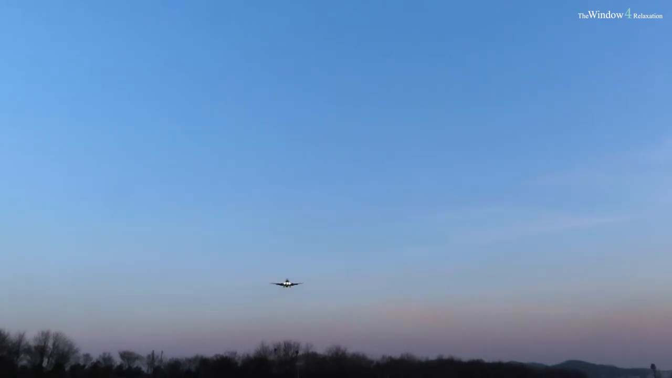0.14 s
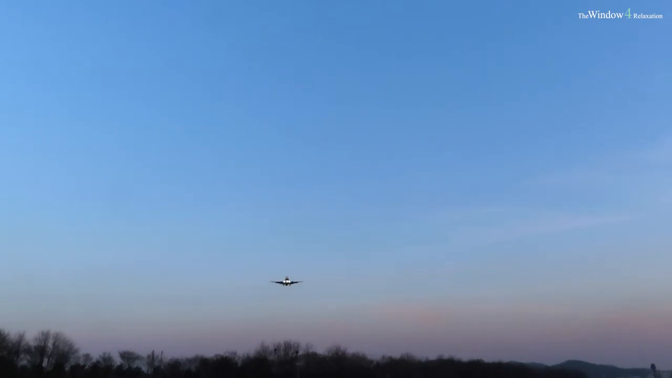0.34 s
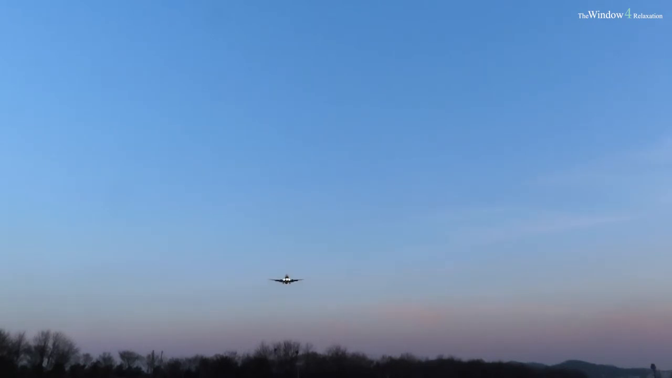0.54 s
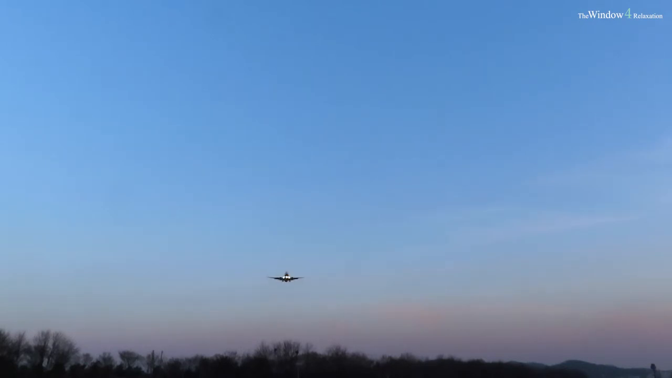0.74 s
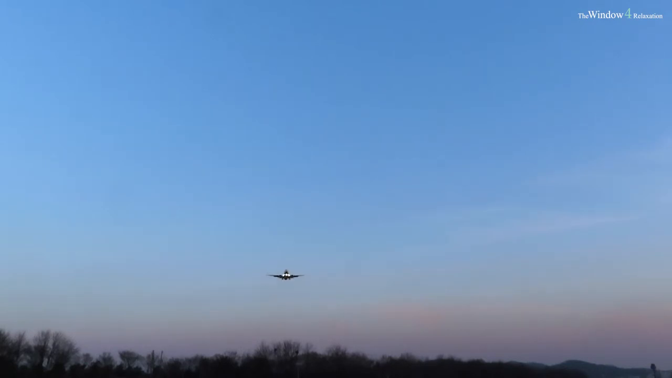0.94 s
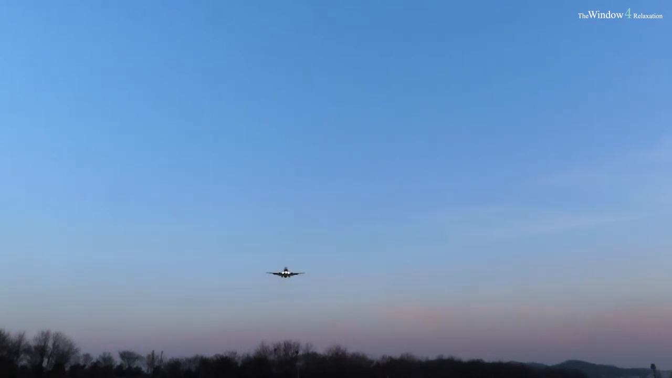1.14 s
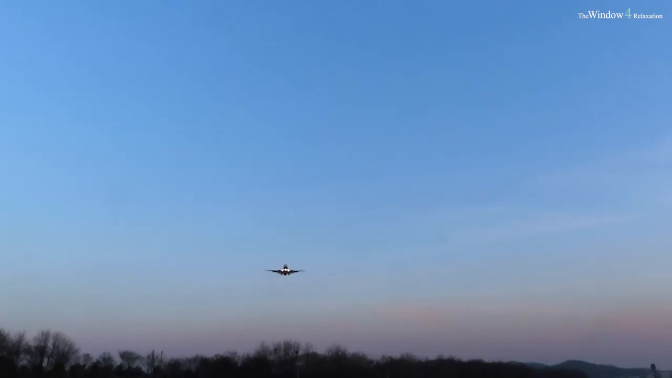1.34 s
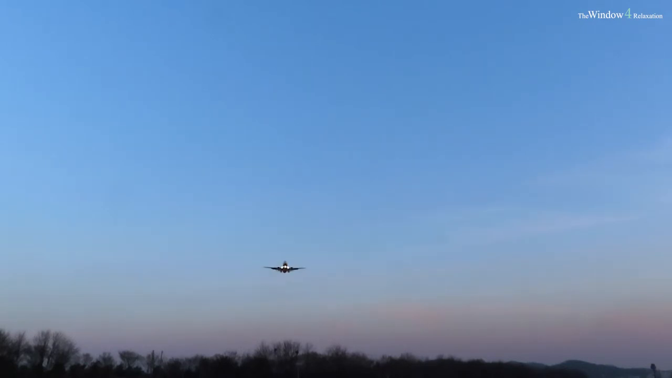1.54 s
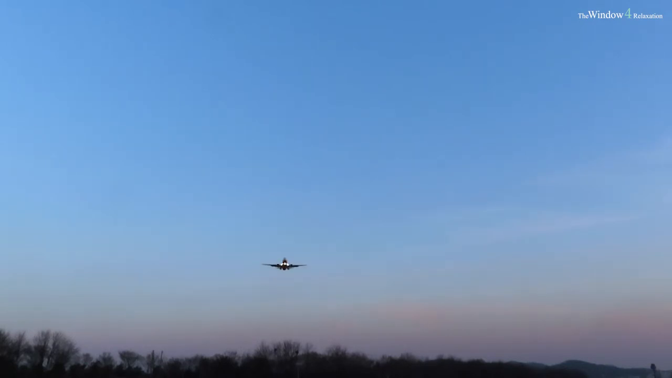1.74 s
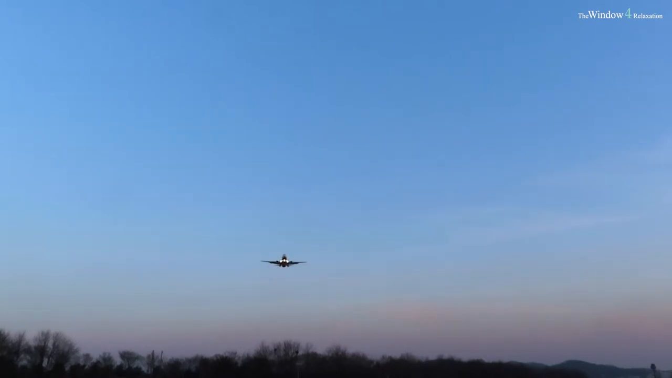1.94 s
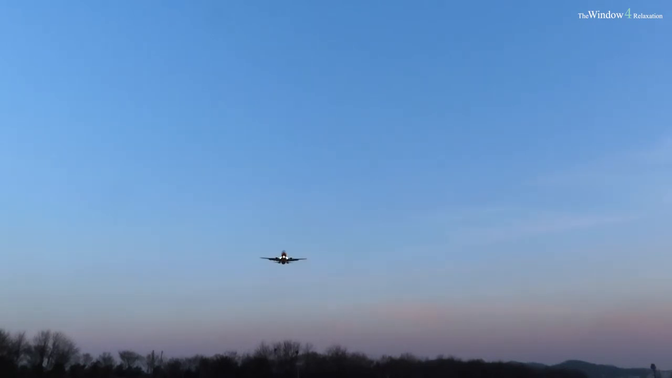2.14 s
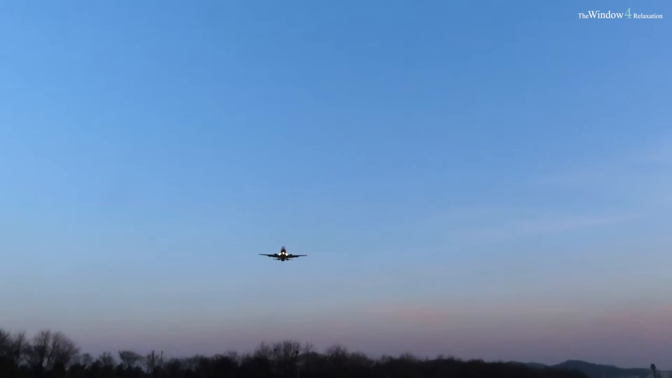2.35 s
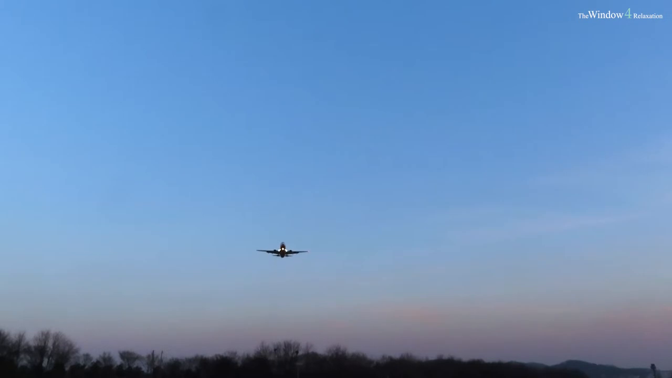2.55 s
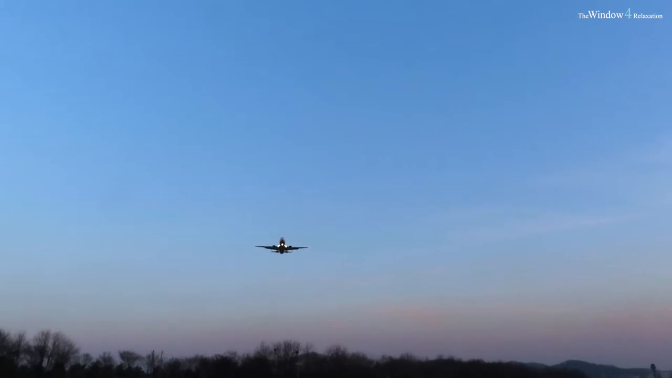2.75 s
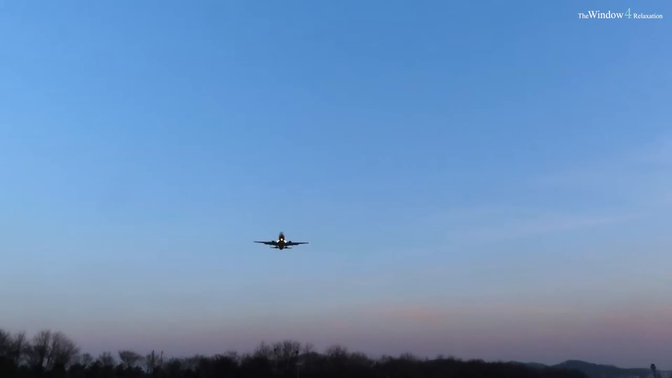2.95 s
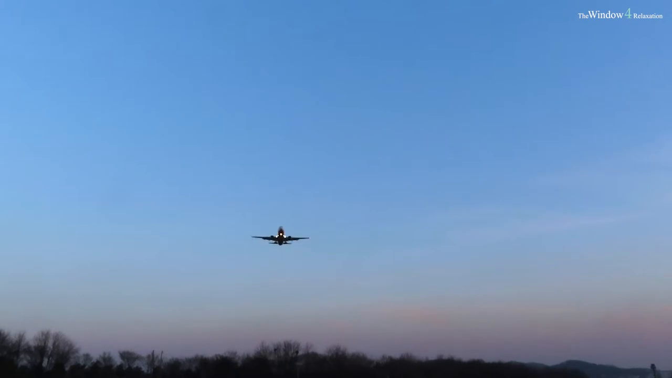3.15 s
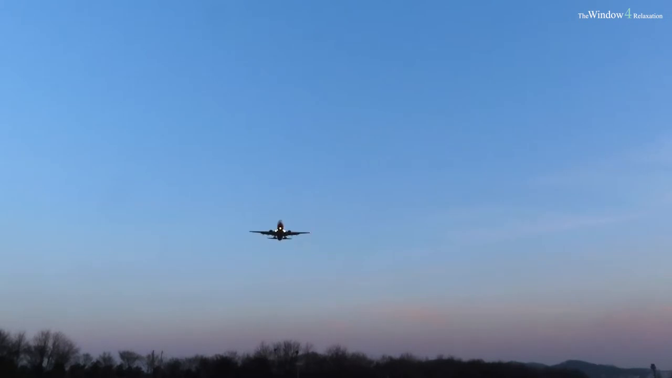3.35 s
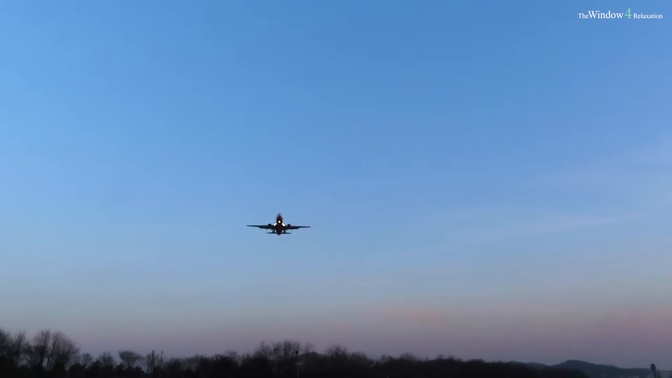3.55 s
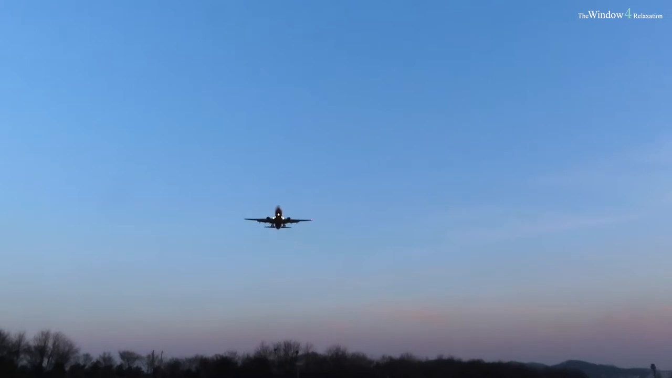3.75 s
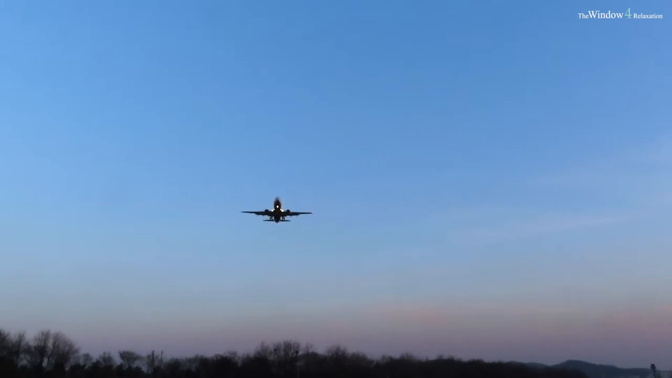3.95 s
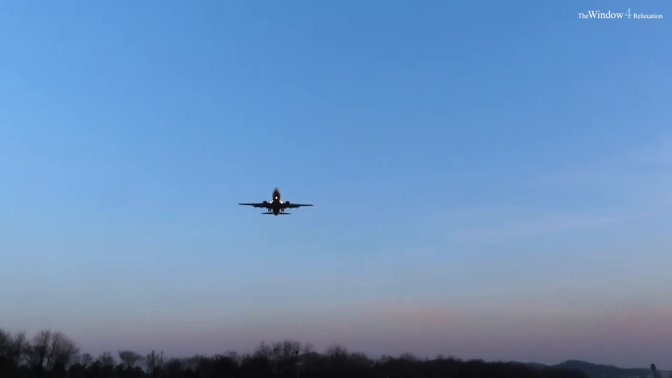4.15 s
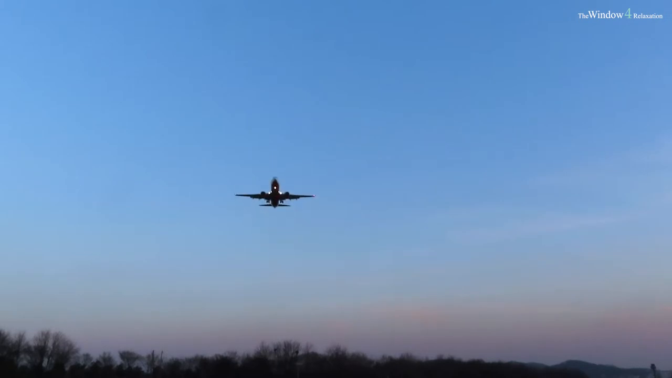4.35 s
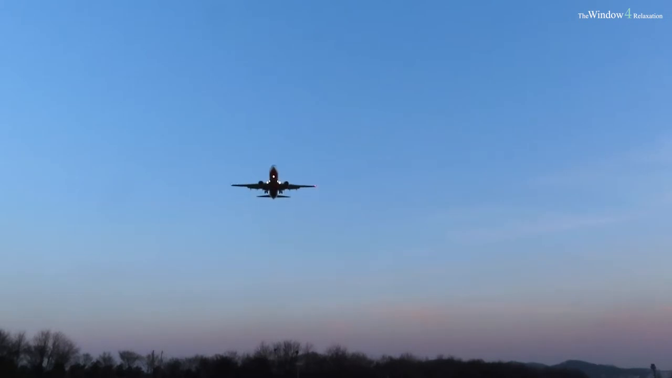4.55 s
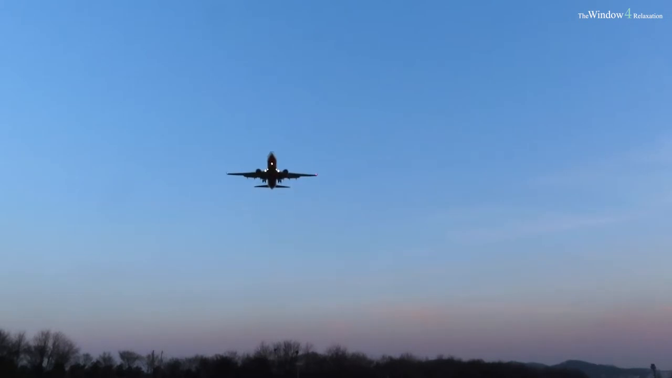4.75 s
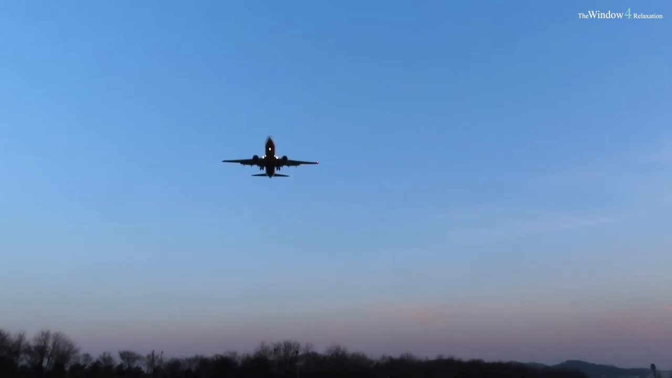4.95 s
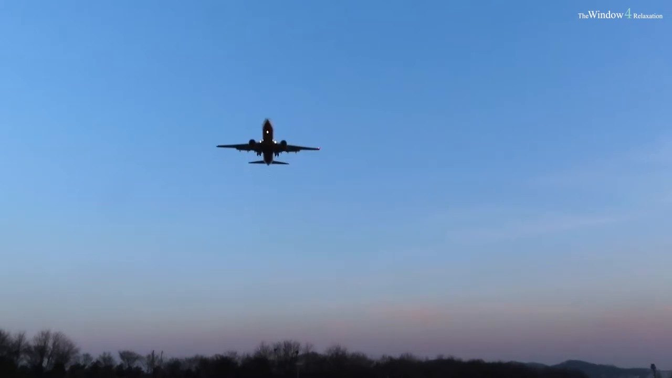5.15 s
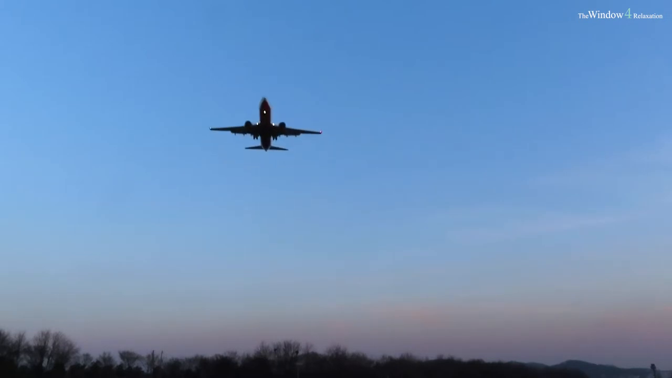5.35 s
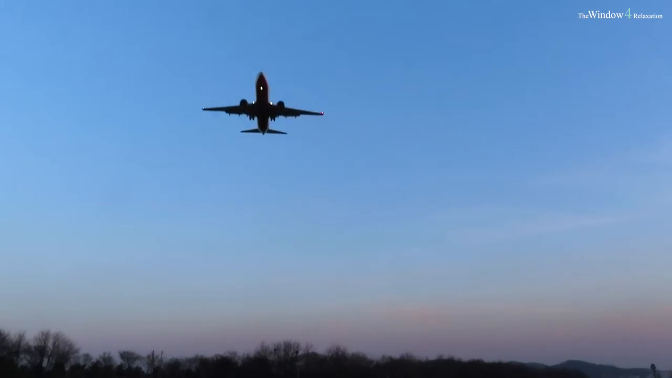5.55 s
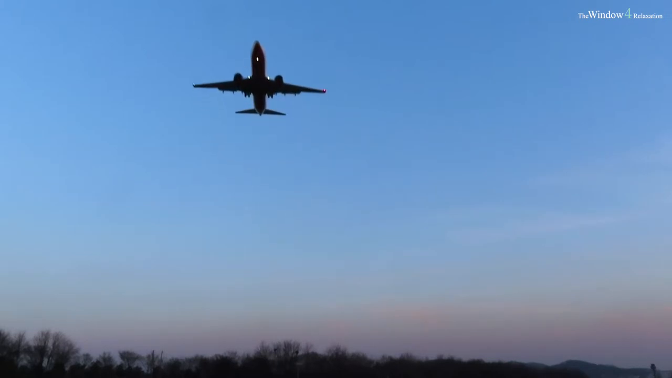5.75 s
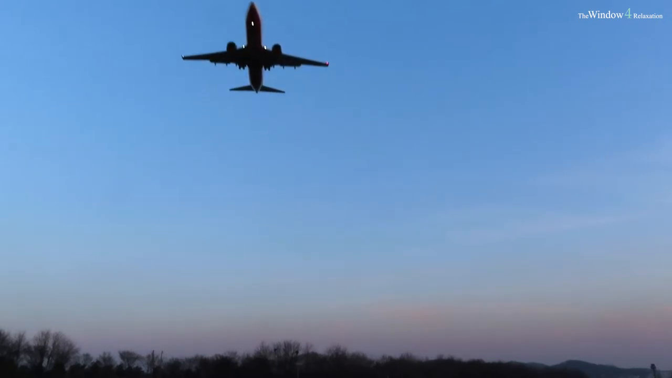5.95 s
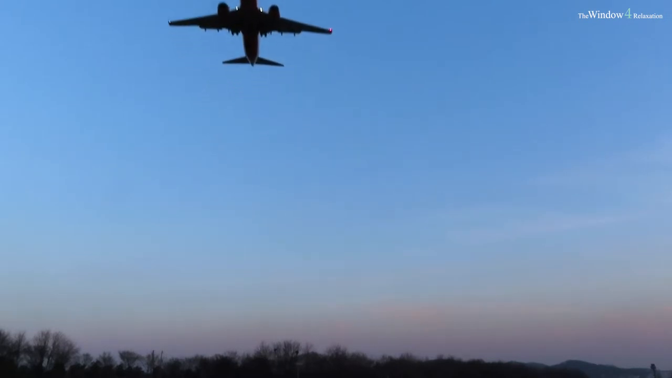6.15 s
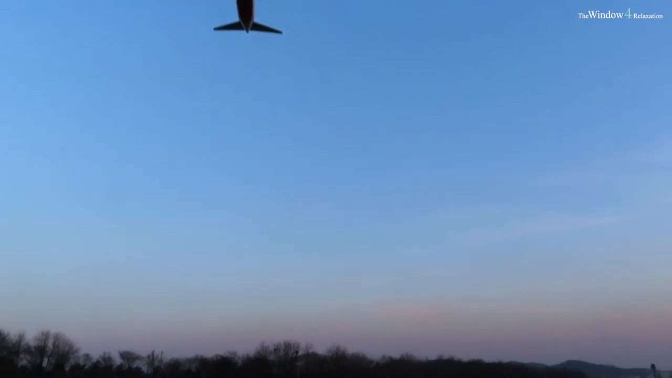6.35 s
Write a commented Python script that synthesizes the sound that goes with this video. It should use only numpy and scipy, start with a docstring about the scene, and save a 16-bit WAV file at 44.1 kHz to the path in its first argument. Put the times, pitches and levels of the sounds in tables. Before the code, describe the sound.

Outdoors, a single jet approaches the listener continuously. At first there is mid-distance engine roar, low rumble and a thin, unsteady turbine whine, dull at the top. As it nears, the roar swells and opens into bright, flickering, rushing noise, with a slow downward flanging from the ground reflection. The high tones bend lower. Nearly centred narrow stereo, faint microphone hiss, no other sounds, ending close to the loudest point.

```python
"""A twin-engine jet on approach flies low toward the listener in an open field.
Its roar is shaped noise; fan tones and a wing whistle are wavering sines that fall in pitch as the
angle opens. The air takes treble, and a ground echo adds notches that slide down as the jet rises.
A low exhaust rumble sinks in pitch below; two close microphone ports add a faint hiss."""
import sys
import numpy as np
from scipy import signal
from scipy.io import wavfile
from scipy.ndimage import uniform_filter1d, map_coordinates

SR = 44100
rng = np.random.default_rng(int(sys.argv[2]) if len(sys.argv) > 2 else 0)


def wav_out(sig):
    """Save sig, one row per channel (or a flat mono array), as 16-bit PCM at SR to the path in sys.argv[1]."""
    wavfile.write(sys.argv[1], SR, np.round(np.clip(np.atleast_2d(sig).T, -1, 1) * 32767).astype(np.int16))


N = 286209
SIZE, HOP = 2048, 512  # short-time frame and step, samples
HZ = np.fft.rfftfreq(SIZE, 1 / SR)
FRAME_S = np.arange(N // HOP + 2) * HOP / SR
SPEED, SOUND = 58.3, 343  # m/s
OVERHEAD_S, HEIGHT = 8.0, 70  # s when the flight line is overhead, m
PITCH_LAG_S = .15  # the pitch heard belongs to a moment just past

# roar of jets and airframe 100 m away in lossless air: f/Hz, level/dB (per Hz, over ROAR_DB)
ROAR = [(15, -32), (30, -20.5), (50, 2.5), (80, 0.5), (150, 3.5), (300, 1), (600, -4.5), (1200, -5),
        (2400, -9), (3800, -9.5), (5200, -2.5), (7800, 1), (10700, -2.5), (13000, 12.5), (15000, 15)]
ROAR_DB = -22.5  # level of one bin at 0 dB


def airliner():
    """Broad roar and tones as they leave the aircraft: fuzz lifts the noise, sines lie on top."""
    s = np.arange(N) / SR
    rise = doppler(s - PITCH_LAG_S)
    tones = fan(rise, side_on(s)) + whistle(rise)
    tones = tones * signal.windows.tukey(N, .01)
    lines = signal.stft(tones, nperseg=SIZE, noverlap=SIZE - HOP)[2][:, :len(FRAME_S)]
    roar = gain_of(fuzz_db()) * noise()
    return gain_of(ROAR_DB + read(ROAR)) * (roar + lines)


# fan shafts of the two engines: f/Hz
SHAFTS_HZ = [49.6, 49.07]
# shaft orders of 24 fan blades and the stage behind them: order
ORDERS = [24, 48, 72, 96, 98, 122, 146, 148, 172]
# fan tones, one row an order: level/dB of first and second engine (over the roar in one bin),
# then change/dB of each when heard side-on
FAN = [(-5.5, 0, -2, -1.5), (-1, -2, -12, -13), (-4, 8, -18.5, -42.5), (9, 3.5, -9.5, -9),
       (12.5, 7.5, -15, -10), (16, 9.5, -24.5, -10), (12.5, 12, 9, -15), (12.5, 6, -7, -3),
       (14, 5.5, -13.5, -10.5)]
# the fan tones come and go: t/s, level/dB of the two lowest orders, of the third,
# of those near 5.7 kHz, near 7.1 kHz and over 8 kHz
TONE_SWELL = [(0, 3.5, -6, 2, 2, 5), (1.1, 2.5, -1, -3, -2, -4), (1.45, -4.5, 13, -3, 2, 4),
              (1.9, -3, 6.5, -3, 3.5, 3), (2.4, -5.5, 3, -2, 4.5, 3), (3.0, -6, -1, -4, 0, 4),
              (3.5, -1, -2, -4.5, -6, -6.5), (4.0, -4.5, -4, -4.5, -4.5, -3.5), (4.25, -1, -4, 1, 2, -5),
              (4.5, 4, -9, 1, -1, -1), (4.75, -3, -4.5, -4.5, -4, -1), (5.0, -3, -1, 0.1, -2, -1),
              (5.2, -7, -4, -2, 0, 0), (5.45, -2, -1, 0.5, 7, 4), (5.7, 4, -4, 1.5, -2, 1.5),
              (5.95, 2, -2, 3.5, 1, 2), (6.1, 4, 0.1, -4, -2, 0), (6.25, -2, -1, -5, -1, -1),
              (6.49, -4, 0.1, -4, -5, -9)]
# swell that each order follows: level column of TONE_SWELL, counted from 0
TONE_COLUMN = [0, 0, 1, 2, 2, 3, 4, 4, 4]


def fan(rise, aside):
    """Blade tones at multiples of each shaft's rate; the intakes beam them forward."""
    s = np.arange(N) / SR
    swells = [np.interp(s, FRAME_S, db) for db in along(TONE_SWELL)]
    tones = np.zeros(N)
    for order, column, row in zip(ORDERS, TONE_COLUMN, FAN):
        blur_hz = order * (.05 + 0.19 * aside)
        for shaft_hz, db, aside_db in zip(SHAFTS_HZ, row[:2], row[2:]):
            level_db = db + aside_db * aside + swells[column]
            tones += tone(order * shaft_hz * rise, level_db, blur_hz, fade_db=2.5)
    return tones


# air over a hollow in the wing, one row: f/Hz at rest, width/Hz, level/dB (over the roar in one bin)
WHISTLE = (365.5, 7.3, -1.7)


def whistle(rise):
    """Air over a hollow in the wing sounds one wavering tone."""
    hz, width_hz, db = WHISTLE
    return tone(hz * rise, db, width_hz / 2, fade_db=2.5)


# shaft orders at the centre of each fuzz hump: order
FUZZ_ORDERS = [72, 97, 122, 147, 171]
# fuzz around the high tones, one row an order: width/Hz, level/dB (over the roar),
# change/dB when heard side-on
FUZZ = [(70, 1.5, -11), (120, -2.5, 4.5), (190, 4.5, 20.5), (200, 1, 14), (300, -1, 12.5)]


def fuzz_db():
    """Eddies in the intake spread humps of noise around the high tones."""
    shaft_hz = np.mean(SHAFTS_HZ) * doppler(FRAME_S - PITCH_LAG_S)
    aside = side_on(FRAME_S)
    total_db = 0
    for order, (width, db, aside_db) in zip(FUZZ_ORDERS, FUZZ):
        hump = np.exp(-((HZ[:, None] - order * shaft_hz) / width) ** 2)
        total_db = total_db + (db + aside_db * aside) * hump
    return total_db


# loss in the air: f/Hz, loss/dB (per 100 m)
ABSORB = [(100, 0.56), (600, -0.25), (1300, 1.57), (1800, 2.5), (2400, 4), (3100, 6.5), (3800, 10.5),
          (4600, 17), (6300, 28), (7800, 35), (10700, 46.5), (12500, 60.5), (15000, 70)]
# level of the low roar: t/s, level/dB
LOW_SWELL = [(0, 1.4), (1.1, -1.5), (3.35, -2), (3.95, 1.9), (5.15, -0.55), (5.9, 2), (6.49, 0.2)]
# the treble swells and sinks as eddies cross the path: t/s, level/dB
TREBLE_SWELL = [(0, 0.5), (.4, 3.5), (1.5, -2), (2.05, 5), (2.3, 3), (2.65, 1.5), (3.0, 3.5), (3.45, -1),
                (3.85, 2), (4.15, 0.5), (4.33, 6), (4.65, 6), (5.12, -5), (5.3, 5), (5.78, 0), (5.9, 3),
                (6.2, 1.8), (6.49, 2)]
# crossfade from the low swell to the treble swell: f/Hz, share of the treble swell (0-1)
TREBLE = [(700, 0), (1300, .4), (2400, .75), (3500, 1), (15000, 1)]
# level of the roar near 1.2 kHz: t/s, level/dB
MID_SWELL = [(0, 0.5), (.15, 1), (.6, -0.5), (.9, 0.5), (1.5, 1), (1.9, 2), (2.22, 2.5), (2.36, 5.5),
             (2.55, 1), (2.7, 0.5), (3.2, 1.5), (3.5, .3), (4.0, 1), (4.4, 1), (5.1, 1), (5.4, -1),
             (6.49, -0.3)]
# level of the jet's top, faded in around 5.5 kHz; it surges in steps as the jet nears: t/s, level/dB
TOP_SWELL = [(4.3, 5), (4.62, 0), (4.85, 3), (5.0, 6.5), (5.15, 2.5), (5.3, 1), (5.45, 0.5), (5.62, 2.5),
             (5.8, -5), (5.87, 0.5), (6.02, -0.5), (6.12, 5), (6.2, -0.5), (6.28, 3.5), (6.36, 0),
             (6.44, 3)]


def air():
    """Gain of the path: spreading, absorption and eddies."""
    far = distance(FRAME_S) / 100  # in units of 100 m
    (low_db,), (high_db,) = along(LOW_SWELL), along(TREBLE_SWELL)
    swell_db = low_db + read(TREBLE) * (high_db - low_db)
    mid_hump = np.exp(-(np.log((HZ[:, None] + 1) / 1200) / 0.36) ** 2)
    swell_db = swell_db + mid_hump * along(MID_SWELL)[0]
    swell_db = swell_db + read([(4500, 0), (6500, 1)]) * along(TOP_SWELL)[0]
    # small eddies make patches that swell and sink
    small_db = (1.17 + 0.15 * read(TREBLE)) * patches(20, 20)
    # the top flickers as a whole, most where the air absorbs most
    flicker = evened(uniform_filter1d(rng.standard_normal(len(FRAME_S)), size=4))
    small_db = small_db + 0.043 * read(ABSORB) * flicker
    return gain_of(swell_db + small_db - read(ABSORB) * far) / far


# echo off soft soil, which turns its phase most at grazing: t/s, lag/ms, phase/rad,
# strength under 400 Hz (0-1), strength over 700 Hz (0-1), both before GROUND and the patches
ECHO = [(0, 1.66, 0.24, 0.5, 0.2), (1, 2.06, .6, 0.59, 0.32), (2.2, 1.86, 0.14, 0.7, 0.25),
        (3.5, 2.12, 0.061, 0.23, 0.37), (4.1, 2.19, 0.098, 0.42, 0.3), (4.8, 2.52, 0.087, .55, 0.65),
        (5.3, 2.81, 0.12, 0.57, 0.77), (5.8, 3.1, 0.078, 0.44, 0.66), (6.2, 3.54, 0.068, 0.48, 0.3),
        (6.49, 3.75, 0.083, 0.48, 0.7)]
# rough ground scatters the treble of the echo: f/Hz, share kept (0-1)
GROUND = [(750, 1), (1150, .6), (1500, .35), (2500, .15), (6000, 0)]
ECHO_JITTER_MS, ECHO_PATCH_DB = .03, 1.0  # eddies near the ground shake the echo, rms


def ground():
    """The direct sound plus its late echo: a comb of notches."""
    lag_ms, phase, low, high = along(ECHO)
    strength = (low + (high - low) * read([(400, 0), (700, 1)])) * read(GROUND)
    lag_ms = lag_ms + ECHO_JITTER_MS * patches(16, 10)
    strength = strength * gain_of(ECHO_PATCH_DB * patches(10, 16))
    turn = -2j * np.pi * HZ[:, None] * lag_ms / 1000 + 1j * phase
    return 1 + np.clip(strength, 0, 1) * np.exp(turn)


# level of the exhaust rumble: t/s, level/dB
RUMBLE_SWELL = [(0, -7), (.6, -1), (1.2, -0.6), (1.7, 0.5), (2.2, -1), (2.8, 1.5), (3.3, 1.5), (3.8, -0.5),
                (4.4, -1.8), (4.9, -3), (5.4, .1), (6.49, -2.5)]
RUMBLE_HZ, SINK_HZ_PER_S = 137.2, 8.37  # centre at the start, and how fast it sinks
RUMBLE_DB, RUMBLE_ASIDE_DB = -10, -33  # level 100 m away, and change when heard side-on
GUST_DB = 1.6  # rms of the lumps in level


def rumble():
    """Exhaust noise in one narrow low hump that sinks as the jet nears and comes in lumps."""
    far = distance(FRAME_S) / 100
    hz = RUMBLE_HZ - SINK_HZ_PER_S * FRAME_S
    hump = np.exp(-(np.log((HZ[:, None] + 1) / hz) / 0.26) ** 2)
    hump = hump / np.linalg.norm(hump, axis=0)
    gusts_db = GUST_DB * evened(uniform_filter1d(rng.standard_normal(len(FRAME_S)), size=6))
    level_db = RUMBLE_DB + RUMBLE_ASIDE_DB * side_on(FRAME_S) ** 2
    level_db = level_db + along(RUMBLE_SWELL)[0] + gusts_db
    return gain_of(level_db) / far * hump * noise()


# level of roar and rumble between about 110 and 170 Hz: t/s, level/dB
BASS_SWELL = [(0, 0.8), (4.1, -1), (4.5, 3), (5.0, 5.5), (5.3, 1), (6.49, .1)]


def bass_swell():
    """Gain of a low band that rises and falls with the approach."""
    return gain_of(read([(90, 0), (125, 1), (165, 1), (200, 0)]) * along(BASS_SWELL)[0])


# left over right, before the off-axis factor: f/Hz, level/dB
LEAN = [(100, 0), (350, .03), (550, .2), (900, .45), (2000, .45), (4000, .8), (9000, .4)]
# left ahead of right, before the off-axis factor: f/Hz, phase/rad
LEAD = [(100, 0), (450, .012), (1000, .017), (2000, .042), (3400, .14), (9000, .3)]
# unlike part of the two ports, next to the smoothed jet: f/Hz, level/dB
SCATTER = [(30, -51.5), (100, -55.5), (170, -49.5), (330, -37), (600, -38), (900, -27), (1800, -25),
           (3500, -16), (8000, -13.5), (13000, -23.5)]


def ports(near):
    """Two close microphone ports hear the jet with slight lean, lead and unlike noise."""
    smooth = uniform_filter1d(abs(near), size=5, axis=0)
    apart = gain_of(read(SCATTER)) * smooth * noise()
    off_axis = .8 + 1.4 * side_on(FRAME_S)  # the ports differ more as the jet leaves the axis
    port = gain_of(off_axis * read(LEAN) / 2) * np.exp(1j * off_axis * read(LEAD) / 2)
    return to_sound(np.array([near * port + apart, near / port - apart]))


# microphone hiss, shape only: f/Hz, level/dB (per Hz)
HISS = [(1000, -5.5), (4000, 1), (6000, -4.5), (7500, -9), (9500, -20.5), (11500, -15.5), (12500, -31.5),
        (14500, -39.5)]
HISS_DB = -67  # rms level


def hiss():
    """Steady microphone noise, partly shared between the ports."""
    shared = noise()
    both = np.array([shared + 2.3 * noise(), shared + 2.0 * noise()])
    return gain_of(HISS_DB) * evened(to_sound(gain_of(read(HISS)) * both))


def distance(s):
    """Metres to an aircraft that flies level toward the listener."""
    return np.hypot(SPEED * (OVERHEAD_S - s), HEIGHT)


def side_on(s):
    """How far the jet is heard from the side: near 0 head-on, 1 when overhead."""
    return (HEIGHT / distance(s)) ** 2


def doppler(s):
    """Rise in pitch from the speed along the line of sight."""
    closing = SPEED * SPEED * (OVERHEAD_S - s) / distance(s)  # m/s
    return 1 / (1 - closing / SOUND)


def tone(hz, db, blur_hz, fade_db):
    """A sine whose pitch and strength waver in the moving air."""
    turns = np.cumsum(hz + blur_hz * wander(12)) / SR + rng.random()
    return gain_of(db + fade_db * wander(6)) * np.sin(2 * np.pi * turns)


def wander(rate_hz):
    """Slow chance of rms 1 up to a rate, one value a sample."""
    knots = rng.standard_normal(int(N / SR * 2 * rate_hz) + 3)
    places = np.linspace(1, len(knots) - 2, N // 64)
    smooth = map_coordinates(knots, [places], order=3)
    return evened(np.interp(np.linspace(0, len(smooth) - 1, N), np.arange(len(smooth)), smooth))


def noise():
    """Random short-time spectra of mean power 1."""
    a, b = rng.standard_normal((len(FRAME_S), len(HZ), 2)).T
    return (a + 1j * b) / np.sqrt(2)


def patches(bins, frames):
    """Random patches of rms 1 over frequency and time."""
    field = rng.standard_normal((len(FRAME_S), len(HZ))).T
    field = uniform_filter1d(field, size=bins, axis=0)
    return evened(uniform_filter1d(field, size=frames, axis=1))


def read(points):
    """A table over frequency, read at every bin as a column."""
    f, value = np.transpose(points)
    return np.interp(np.log(HZ + 1), np.log(f + 1), value)[:, None]


def along(points):
    """The columns of a table over time, read at every frame."""
    s, *columns = np.transpose(points)
    return [np.interp(FRAME_S, s, c) for c in columns]


def gain_of(db):
    """Decibels to gain."""
    return 10 ** (np.asarray(db) / 20)


def evened(x):
    """Scales to rms 1."""
    return x / np.sqrt(np.mean(abs(x) ** 2) + 1e-20)


def to_sound(spectra):
    """Short-time spectra to samples."""
    return signal.istft(spectra, nperseg=SIZE, noverlap=SIZE - HOP)[1]


def scene():
    """The jet on two close microphone ports, over a faint hiss."""
    near = airliner() * air() * ground() + rumble()
    jet = ports(near * bass_swell())
    return (jet + hiss())[:, :N]


EDGE_HZ = 14500  # upper band limit


def record(dry):
    """Peaks round off near full scale; then the band limit."""
    soft = dry / (1 + dry ** 6) ** (1 / 6)
    soft = np.pad(soft, [(0, 0), (255, 255)], mode="reflect", reflect_type="odd")
    lowpass = signal.firwin(511, EDGE_HZ, window=("kaiser", 9), fs=SR)
    return signal.oaconvolve(soft, lowpass[None], "valid", axes=1)


dry = scene()
out = record(dry)
wav_out(out)
```